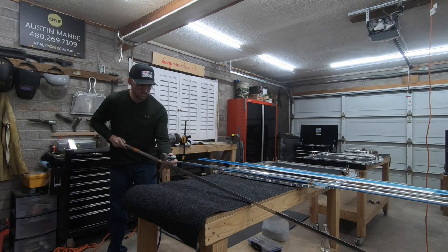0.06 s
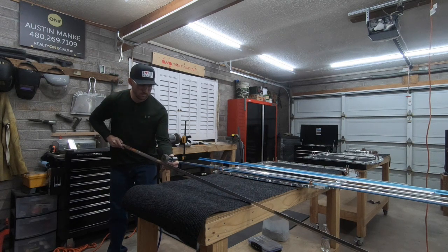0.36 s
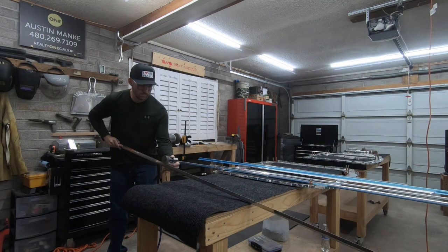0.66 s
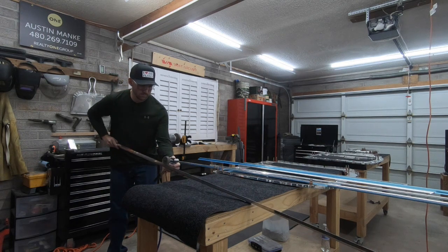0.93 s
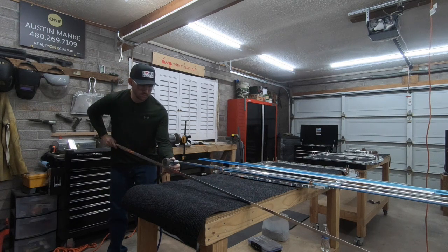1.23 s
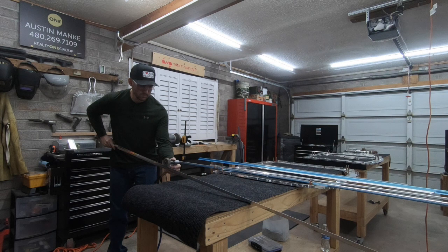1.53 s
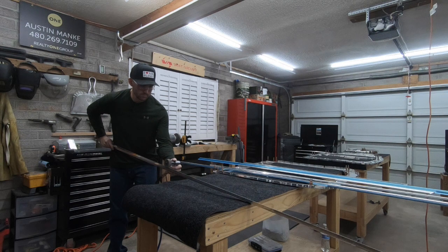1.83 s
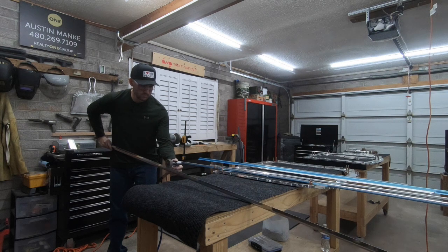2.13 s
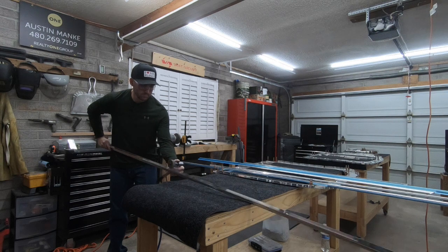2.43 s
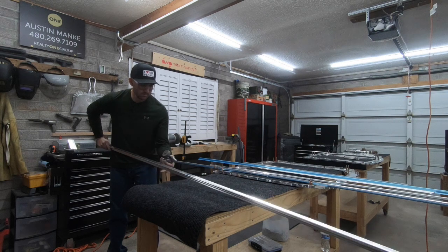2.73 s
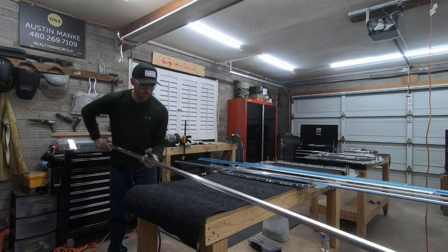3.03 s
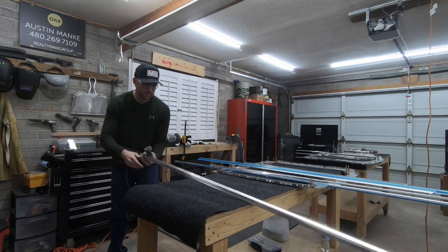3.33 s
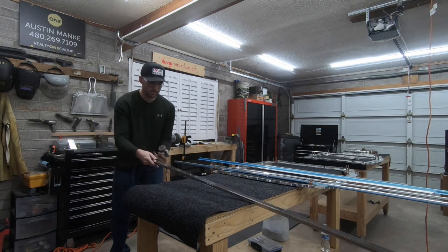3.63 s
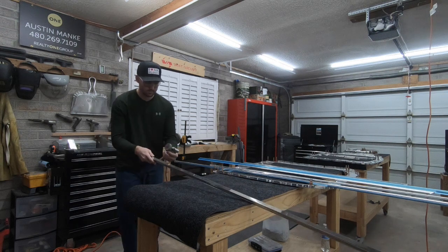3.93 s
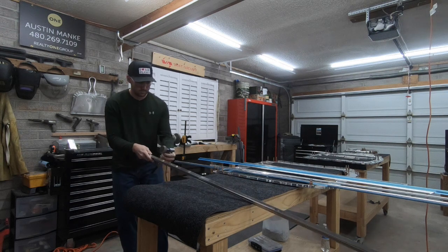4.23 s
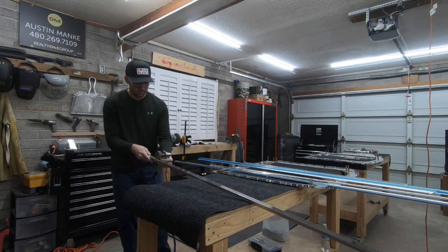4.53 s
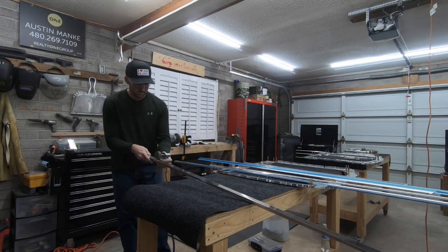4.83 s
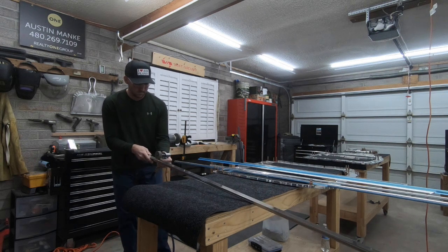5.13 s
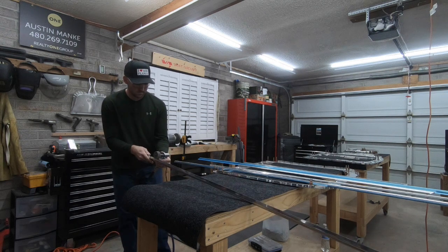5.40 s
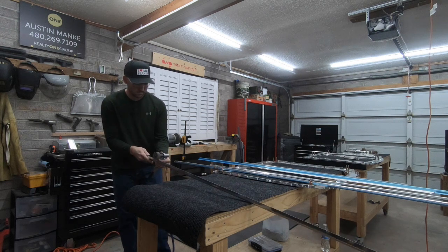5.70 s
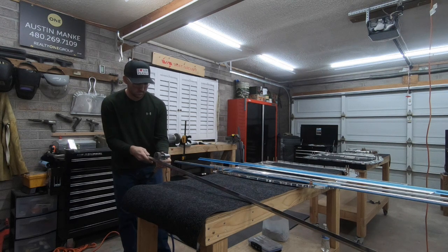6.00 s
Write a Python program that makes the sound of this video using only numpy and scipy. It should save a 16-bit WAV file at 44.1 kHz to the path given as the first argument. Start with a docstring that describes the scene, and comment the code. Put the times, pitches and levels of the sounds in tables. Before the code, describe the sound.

A handheld air grinder runs an abrasive wheel along a metal strip, whining, hissing and rasping as its pitch sags under load. It cuts off and the wheel brushes to a halt. The strip is faintly slid and scuffed over a padded bench. Air then leaks softly with a couple of clicks, and the tool spins up again, higher and louder. The microphone picks up some garage reverberation.

```python
"""A garage: an air die grinder runs an abrasive wheel along a metal strip.
The five-vane motor whines and hisses, one exhaust puff per vane, and sags under load; the grit rasps
and rings the strip. The throttle shuts, the rotor coasts, the strip slides over a padded bench.
Then the valve cracks open with a hiss and the motor spins up again."""
import sys
import numpy as np
from scipy import signal
from scipy.fft import rfft, irfft
from scipy.io import wavfile
from scipy.ndimage import uniform_filter1d

SR = 44100
rng = np.random.default_rng(int(sys.argv[2]) if len(sys.argv) > 2 else 0)


def transcribe(u):
    """Save the signal u as a 16-bit wav file named by the first command-line argument.

    u: samples, shape (n,) or (channels, n), limited to [-1, 1]; the rate is SR.
    q: integer samples, one column per channel.
    """
    v = np.clip(np.atleast_2d(u).T, -1, 1)
    q = np.round(v * 32767).astype(np.int16)
    wavfile.write(sys.argv[1], SR, q)


N = 276066
TIME_S = np.arange(N) / SR
BINS_HZ = np.fft.rfftfreq(N, 1 / SR)
VANES = 5
SHUT_S, RESTART_S = 2.35, 5.6  # throttle shuts, rotor breaks free again


def amp(db):
    """Decibels to gain."""
    return 10 ** (np.asarray(db) / 20)


def unit(x):
    """Scales to rms 1."""
    return x / np.sqrt(np.mean(x ** 2) + 1e-20)


def at_hz(points, hz):
    """Interpolates (Hz, value) rows on a log-frequency axis."""
    row_hz, values = np.transpose(points)
    return np.interp(np.log(hz + 1), np.log(row_hz + 1), values)


def curve(rows, column=1):
    """One column of a timed table at every sample."""
    rows = np.array(rows)
    return np.interp(TIME_S, rows[:, 0], rows[:, column])


def envelope(start_s, rise_s, hold_s, fall_db_per_s):
    """Linear rise, hold, exponential fall."""
    age_s = TIME_S - start_s
    return np.clip(age_s / rise_s, 0, 1) * amp(-fall_db_per_s * np.maximum(age_s - rise_s - hold_s, 0))


def noise():
    """White noise."""
    return rng.standard_normal(N)


def wander(cutoff_hz, size=4096):
    """Low-passed random drift, rms about 1."""
    rates_hz = np.fft.rfftfreq(size, TIME_S[-1] / size)
    drift = unit(irfft(rfft(rng.standard_normal(size)) / (1 + (rates_hz / cutoff_hz) ** 4)))
    return np.interp(TIME_S, np.linspace(0, TIME_S[-1], size), drift)


def colour(x, spectrum):
    """Filters x by (Hz, dB) rows, to rms 1."""
    return unit(irfft(rfft(x) * amp(at_hz(spectrum, BINS_HZ)), N))


def highpass(x, hz):
    """The part of x above hz."""
    return irfft(rfft(x) * (1 - 1 / (1 + (BINS_HZ / hz) ** 4)), N)


def ring(x, modes):
    """Passes x through parallel resonances, to rms 1."""
    response = sum(amp(db) / np.sqrt(width_hz) / (1 + 1j * (BINS_HZ**2 - hz**2) / (width_hz*BINS_HZ + 1))
                   for hz, width_hz, db in modes)
    return unit(irfft(rfft(x) * response, N))


def background(air_db=-64, rumble_db=-49.0, ease_db_per_s=1.6, sway_db=3.0):
    """Room air over a low rumble that sways and slowly eases."""
    # Each row: frequency in Hz, relative density in dB.
    air_spectrum = [(65, -38.5), (110, -3), (293, -10), (392, -17.5), (435, -12.5), (536, -16.5),
                    (865, -12.5), (1020, -15.5), (1690, -24), (16000, -39.5)]
    rumble_spectrum = [(8.8, -25.5), (15, 7), (70, 0.5), (83, -4.5), (103, -22.5), (130, -21.5), (170, -46),
                       (290, -120)]
    air = amp(air_db) * colour(noise(), air_spectrum)
    rumble_gain = amp(rumble_db - ease_db_per_s * TIME_S + sway_db * wander(4))
    return air + rumble_gain * colour(noise(), rumble_spectrum)


def garage_tail(gap_s=0.0063):
    """Dense wall reflections of energy 1, shortest near 10 kHz."""
    # Each row: frequency in Hz, T60 in seconds.
    decay = [(200, 0.84), (500, 0.71), (2000, 0.47), (5000, 0.61), (10000, 0.21), (16000, 0.6)]
    hz, age_s, frames = signal.stft(rng.standard_normal(SR), SR, nperseg=256)
    t60_s = at_hz(decay, hz)[:, None]
    tail = signal.istft(frames * amp(-60 * age_s / t60_s), SR, nperseg=256)[1]
    onset = np.clip(TIME_S[:len(tail)] / gap_s - 1, 0, 1)
    frames = signal.stft(tail * onset, SR, nperseg=256)[2]
    tail = signal.istft(frames / np.sqrt(t60_s), SR, nperseg=256)[1]  # evens out energy per Hz
    return tail / np.linalg.norm(tail)


def in_room(x, tail, wet_db):
    """Direct sound plus reflections, at about the same power."""
    return (x + amp(wet_db) * signal.fftconvolve(x, tail)[:N]) / np.hypot(1, amp(wet_db))


def ticks(t60_s=0.059):
    """Damped clicks of the strip and the throttle lever."""
    # Each row: start in seconds, relative level in dB, centre in Hz, width in Hz.
    clicks = [(3.363, -58, 5000, 3000), (3.507, -49, 7800, 503), (3.508, -57, 11500, 3980),
              (4.23, -62, 3500, 2530), (4.691, -43, 1180, 1190), (5.089, -48, 700, 600),
              (5.51, -37, 8900, 5000)]
    sound = np.zeros(N)
    for start_s, db, hz, width_hz in clicks:
        burst = amp(db - 60 * np.maximum(TIME_S - start_s, 0) / t60_s) * (TIME_S >= start_s)
        sound += burst * ring(noise(), [(hz, width_hz, 0)]) / 2
    return sound


def friction(grain_db=1.5):
    """Countless tiny slips that come in clumps."""
    return unit(noise() * amp(grain_db * wander(150)))


def strip_handling(pull_db=-63.0, regrip_db=-60.0):
    """The strip rings as it is pulled through the hand and regripped, then scuffs over the bench pad."""
    # Each row: mode in Hz, width in Hz, relative level in dB.
    pull_modes = [(2980, 82, 1.5), (4380, 170, 4.5), (4990, 140, 2), (6300, 500, -3), (6840, 300, -13),
                  (8840, 440, -9)]
    regrip_modes = [(4150, 200, -0.5), (4460, 1800, 1), (7700, 940, -12), (9100, 510, -7)]
    # Each row: start in seconds, rise in seconds, peak in dB, fall in dB per second.
    drags = [(3.615, 0.15, -45, 175), (4.0, 0.041, -68.5, 120), (4.22, 0.014, -63.5, 114)]
    # Each row: frequency in Hz, relative density in dB.
    scuff_spectrum = [(240, -57), (400, -29), (570, -8), (616, -4), (655, -10), (1350, -5), (1650, -1),
                      (3310, 1), (6850, -16), (9320, -24), (16000, -35)]
    pull = amp(pull_db) * ring(friction(), pull_modes)
    pull *= envelope(start_s=2.725, rise_s=0.058, hold_s=0.42, fall_db_per_s=86)
    regrip = amp(regrip_db) * ring(friction(), regrip_modes)
    regrip *= envelope(start_s=3.274, rise_s=0.26, hold_s=0.23, fall_db_per_s=200)
    strokes = sum(amp(db) * envelope(start_s, rise_s, 0, fall) for start_s, rise_s, db, fall in drags)
    return pull + regrip + strokes * colour(friction(), scuff_spectrum)


def wheel_brush(level_db=-33.0, halt_s=3.05, fade_s=0.12):
    """The coasting wheel brushes to a halt."""
    # Each row: frequency in Hz, relative density in dB.
    spectrum = [(240, -46.5), (400, -12), (545, -9.5), (1290, -11.5), (1560, -10), (1960, -5.5), (2120, -5),
                (3260, -1.5), (3530, -6), (5430, -10.5), (7400, -22), (11000, -14), (16000, -42)]
    contact = envelope(start_s=2.297, rise_s=0.045, hold_s=0.087, fall_db_per_s=45.5)
    fade = np.clip((halt_s - TIME_S) / fade_s, 0, 1)
    return amp(level_db) * colour(friction(), spectrum) * contact * fade


def valve_leak(sputter_db=1.0, split_hz=2800, rise_s=0.036, fall_s=0.15):
    """Air hisses through the cracked valve, past the still rotor."""
    # Each row: frequency in Hz, relative density in dB.
    spectrum = [(120, -30.5), (300, -16), (650, -10.5), (950, -6), (1400, -2.5), (2300, -2.5), (3300, -1.5),
                (3900, -1.5), (4500, 3), (5200, -0.5), (6000, -6), (11200, -4.5), (12400, -16),
                (15000, -10), (16000, -15)]
    # Each row: time in seconds, level in dB, relative weight of the low band in dB.
    flow = [(4.71, -46.5, -10), (4.736, -46.5, -9), (4.948, -48.5, -7), (5.078, -46, -7), (5.23, -49, -4.5),
            (5.446, -46.5, -8), (5.58, -42, -7)]
    hiss = colour(noise() * amp(sputter_db * wander(25)), spectrum)
    high = highpass(hiss, split_hz)
    low_db = curve(flow, column=2) - np.median(np.array(flow)[:, 2])
    start_s, end_s = flow[0][0], flow[-1][0]
    gate = np.interp(TIME_S, [start_s - rise_s, start_s, end_s, end_s + fall_s], [0, 1, 1, 0])
    return (high + amp(low_db) * (hiss - high)) * amp(curve(flow)) * gate


def squeals(width_hz=16):
    """One mode of the strip swells briefly into a thin whistle."""
    # Each row: middle in seconds, half length in seconds, mode in Hz, peak in dB.
    swells = [(.9, .14, 2338, -36.5), (0.916, .12, 3540, -38.5), (1.9, .12, 3171, -36.5)]
    return sum(amp(db) * np.exp(-((TIME_S - mid_s) / half_s) ** 2) * ring(noise(), [(hz, width_hz, 0)])
               for mid_s, half_s, hz, db in swells)


def shaft_turns(vane_hz, waver=0.00299):
    """Rotor angle in turns; the wheel's bite unsettles it slightly."""
    return np.cumsum(vane_hz / VANES * (1 + waver * wander(25))) / SR


def wheel_rasp(turns, steps=4096):
    """Four tracks of uneven grit repeat each turn; contact shifts among them as the hand moves."""
    # Each row: frequency in Hz, relative gain in dB.
    spectrum = [(700, -24), (1500, -7), (2100, -4.5), (3400, -0.5), (4300, 3), (5200, -2.5), (9000, -17),
                (16000, -22.5)]
    tracks = signal.resample(rng.standard_normal((4, 160)), steps, axis=1)
    position = (turns % 1 * steps).astype(int)
    contact = np.array([wander(3.74) for _ in tracks])
    grit = (tracks[:, position] * contact).sum(0) / np.linalg.norm(contact, axis=0)
    return colour(grit, spectrum)


def grind(vane_hz, turns, hiss_spectrum, hiss_db, rasp_db, ring_db, swell_db, dull_db):
    """Vane-pulsed exhaust hiss and wheel rasp; both ring the strip."""
    # Each row: mode in Hz, width in Hz, relative level in dB.
    strip_modes = [(2063, 22, 2.5), (2178, 10, 1), (2354, 20, -1.5), (2537, 26, 1.5), (2725, 6.9, -1),
                   (2940, 18, -8.5), (3156, 17, -2.5), (3450, 20, -10.5), (3520, 9.8, -4.5), (4070, 40, 1),
                   (4245, 18, -2), (4420, 40, -7.5)]
    puff_depth, flicker_db = 0.28, 0.73
    working_hz, treble_hz = 480, 6200  # the levels hold at the working vane rate
    puffs = 1 + puff_depth * np.cos(2 * np.pi * VANES * turns)
    hiss = colour(noise() * puffs * amp(flicker_db * wander(53)), hiss_spectrum)
    rasp = wheel_rasp(turns)
    sound = amp(hiss_db) * hiss + amp(rasp_db) * rasp + amp(ring_db) * ring(rasp + hiss, strip_modes)
    # faster is louder and duller
    overspeed = vane_hz / working_hz - 1
    sound += (amp(-dull_db * overspeed) - 1) * highpass(sound, treble_hz)
    return sound * amp(swell_db * overspeed)


def whine(vane_hz, turns, vane_gain_db, shaft_gain_db, imbalance_db, flutter):
    """Each vane lets out a puff; unequal vanes and the wheel add the other shaft orders."""
    # Each row: multiple of the vane rate, relative level in dB.
    vane_harmonics = [(1, -35), (2, -36.5), (3, -38)]
    # Each row: frequency in Hz, radiation gain of the tool in dB.
    radiation = [(150, -4), (340, -5), (440, -2), (550, 2), (720, -2), (900, 1), (1400, -0.5), (1500, -3.5),
                 (1550, 2), (1605, 5), (1665, -7), (2000, -1)]
    # Each row: multiple of the shaft rate, relative level in dB.
    shaft_orders = [(2, -26.5), (3, -18.5), (4, -13), (6, -19), (7, -18.5), (9, -15.5), (11, -19.5),
                    (12, -26), (13, -25), (14, -17.5), (16, -25.5), (19, -13), (20, -6.5), (21, -8),
                    (23, -13.5), (24, -19.5), (25, -9), (27, -19), (30, -22), (32, -6), (35, -13),
                    (38, -14), (40, -19.5)]
    sway_db, contact_db = 1.16, 2
    boom_hz, boom_width_hz, boom_db = 329, 10, 14  # resonance of the strip on the bench
    full_whine_hz, db_per_octave = 435, 7  # weaker below this vane rate
    vanes = np.zeros(N)
    for k, db in vane_harmonics:
        gain = amp(db + at_hz(radiation, k * vane_hz) + sway_db * wander(5.3))
        gain *= 1 + flutter * wander(30)
        vanes += gain * np.cos(2 * np.pi * (VANES * k * turns + rng.random()))
    shaft_hz = vane_hz / VANES
    orders = np.zeros(N)
    for k, db in shaft_orders:
        lift_db = boom_db / (1 + (2 * (k * shaft_hz - boom_hz) / boom_width_hz) ** 2)
        gain = amp(db + contact_db * wander(2.2) + lift_db)  # comes and goes as the contact shifts
        orders += gain * np.cos(2 * np.pi * (k * turns + rng.random()))
    imbalance = amp(imbalance_db) * (shaft_hz / shaft_hz.max()) ** 2 * np.cos(2 * np.pi * turns)
    strength = amp(db_per_octave * np.log2(np.clip(vane_hz / full_whine_hz, 1e-9, 1)))
    return np.sqrt(2) * strength * (amp(vane_gain_db) * vanes + amp(shaft_gain_db) * orders + imbalance)


def spin_up(free_vane_hz=696, spin_up_s=0.265, lead_s=0.05, open_s=0.14):
    """Throttle opens: steady torque against air drag, with a fuzzy rising whistle. Gives (tones, air)."""
    # Each row: frequency in Hz, relative density in dB.
    hiss_spectrum = [(120, -37), (200, -19), (465, -15), (700, -15), (1100, -11.5), (1500, -5), (2020, -5),
                     (3000, -2), (3600, -1.5), (4300, 5), (5100, 0.5), (6000, -2), (8000, -2), (10300, 0),
                     (12500, -5.5), (16000, -9.5)]
    whistle_db, whistle_order = -31.5, 37
    vane_hz = free_vane_hz * np.tanh(np.maximum(TIME_S - RESTART_S, 0) / spin_up_s)
    turns = shaft_turns(vane_hz)
    tones = whine(vane_hz, turns, vane_gain_db=0.5, shaft_gain_db=-37.5, imbalance_db=-60.5, flutter=0.52)
    air = grind(vane_hz, turns, hiss_spectrum,
                hiss_db=-24.5, rasp_db=-43.5, ring_db=-56.0, swell_db=8.0, dull_db=2.5)
    whistle_gain = amp(whistle_db) * (vane_hz / free_vane_hz) ** 3 * wander(200)
    whistle = whistle_gain * np.cos(2 * np.pi * whistle_order * turns)
    throttle = np.clip((TIME_S - RESTART_S + lead_s) / open_s, 0, 1)
    return tones, (air + whistle) * throttle


def loaded_run(coast_tau_s=0.2884, whine_fall_db_per_s=137.5, air_fall_db_per_s=330):
    """Speed follows the load; once the throttle shuts, friction slows the rotor. Gives (tones, air)."""
    # Each row: time in seconds, vane rate in Hz.
    speed = [(0.0, 472), (0.16, 496.4), (0.33, 537), (0.54, 534.4), (0.81, 554.2), (1.0, 551.2),
             (1.07, 541.6), (1.22, 430.8), (1.31, 416.7), (1.33, 433.7), (1.4, 458.8), (1.52, 471.8),
             (1.8, 449.8), (2.08, 450.4), (2.16, 439.8), (2.26, 476.7), (2.28, 509.6), (2.35, 642.4)]
    # Dips in the whine. Each row: middle in seconds, half length in seconds, gain in dB.
    falters = [(0.193, .025, -4.5), (1.292, 0.022, -10.5)]
    # Each row: frequency in Hz, relative density in dB.
    hiss_spectrum = [(120, -37), (200, -18), (360, -15), (424, -10), (696, -12.5), (968, -12.5),
                     (1080, -8.5), (1650, -7.5), (2020, -5), (2910, -3.5), (4200, -0.5), (8120, -4),
                     (12800, -5), (15100, -10), (16000, -21.5)]
    coast_s = np.maximum(TIME_S - SHUT_S, 0)
    vane_hz = uniform_filter1d(curve(speed), 900, mode="nearest") * np.exp(-coast_s / coast_tau_s)
    turns = shaft_turns(vane_hz)
    falter_db = sum(db * np.exp(-((TIME_S - mid_s) / half_s) ** 2) for mid_s, half_s, db in falters)
    tones = whine(vane_hz, turns, vane_gain_db=2.0, shaft_gain_db=-36.5, imbalance_db=-61, flutter=0.14)
    tones *= amp(falter_db - whine_fall_db_per_s * coast_s)
    air = grind(vane_hz, turns, hiss_spectrum,
                hiss_db=-26.0, rasp_db=-35.5, ring_db=-39.5, swell_db=7.0, dull_db=8.0)
    return tones, (air + squeals()) * amp(-air_fall_db_per_s * coast_s)


def scene():
    """Both runs and the handling in the garage; wall reflections give a narrow stereo spread."""
    # Each row: frequency in Hz, side relative to mid in dB.
    width = [(50, -17), (150, -18), (500, -31), (2500, -29.5), (5500, -23), (10000, -18), (15000, -15)]
    tones, air = np.add(loaded_run(), spin_up())
    tail = garage_tail()
    mid = in_room(tones, tail, wet_db=-6.0)
    mid += in_room(air + valve_leak() + wheel_brush() + strip_handling() + ticks(), tail, wet_db=-5.0)
    mid += background()
    scattered = signal.fftconvolve(mid, garage_tail())[:N]
    side = irfft(rfft(scattered) * amp(at_hz(width, BINS_HZ)), N)
    return np.array([mid + side, mid - side])


def record(dry):
    """Steep low-pass near 16 kHz."""
    taps = signal.firwin(511, 16050, window=("kaiser", 9), fs=SR)
    return signal.oaconvolve(dry, taps[None], "same")


dry = scene()
out = record(dry)
transcribe(out)
```